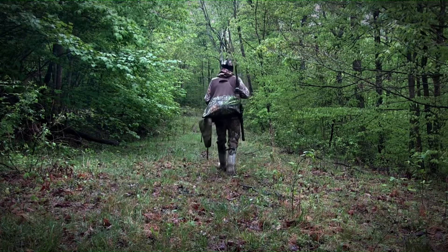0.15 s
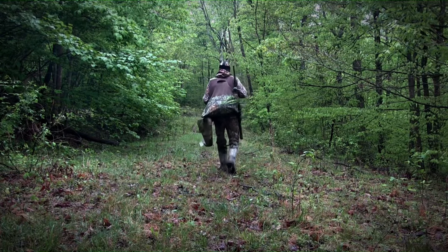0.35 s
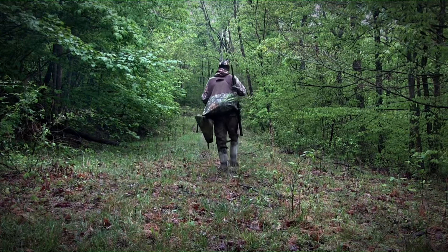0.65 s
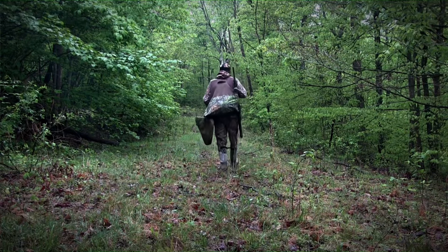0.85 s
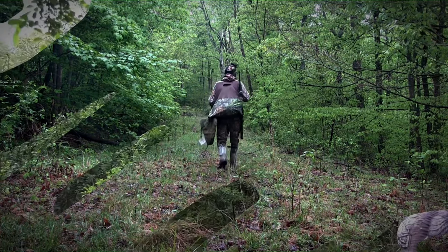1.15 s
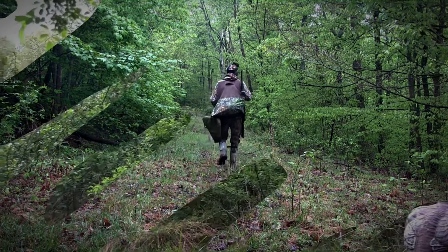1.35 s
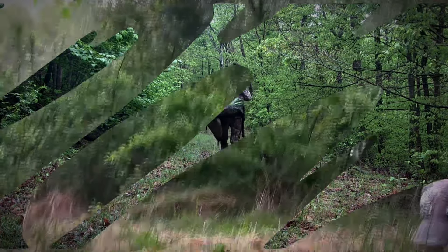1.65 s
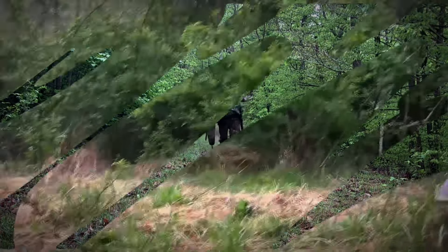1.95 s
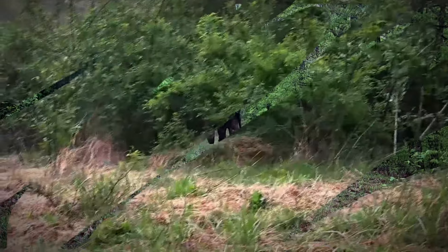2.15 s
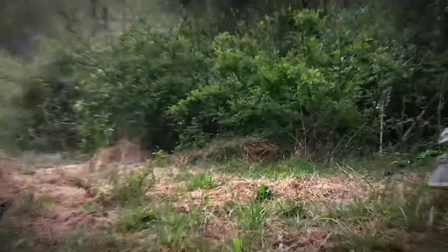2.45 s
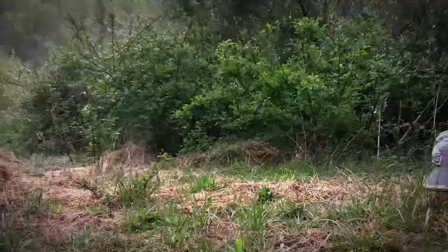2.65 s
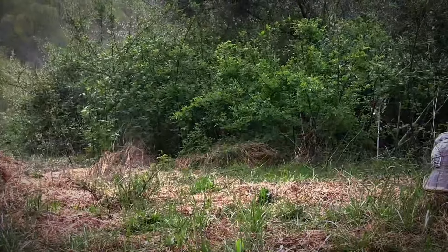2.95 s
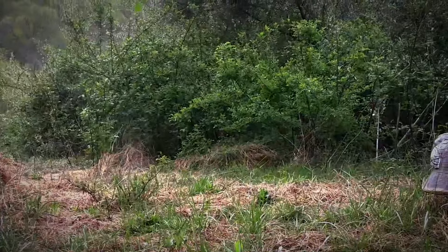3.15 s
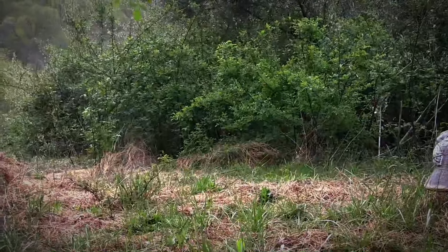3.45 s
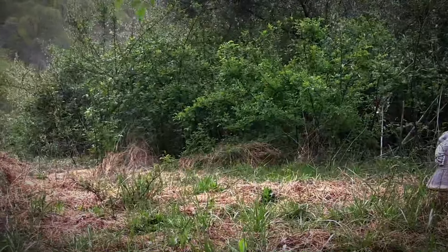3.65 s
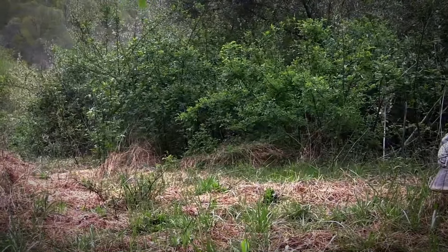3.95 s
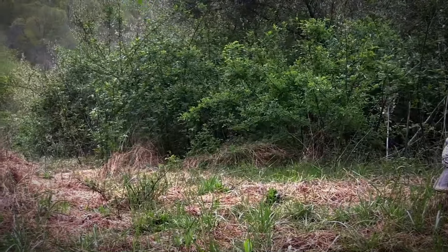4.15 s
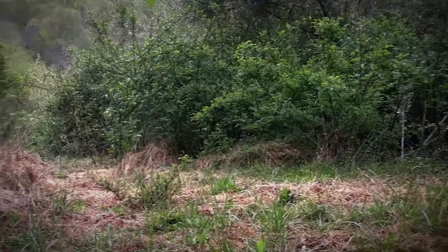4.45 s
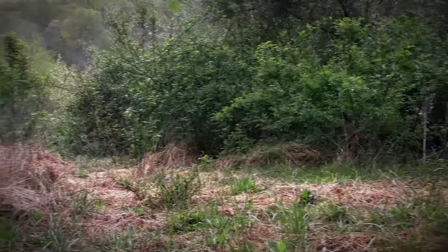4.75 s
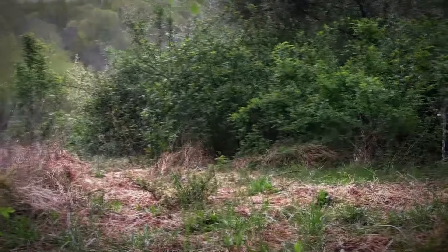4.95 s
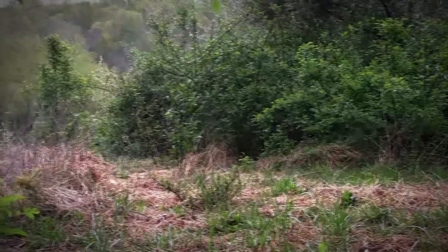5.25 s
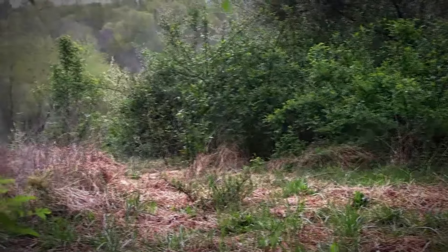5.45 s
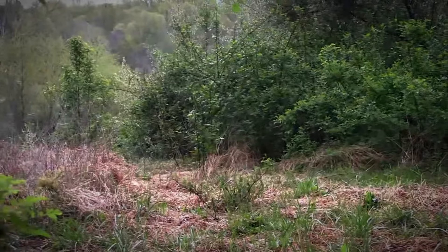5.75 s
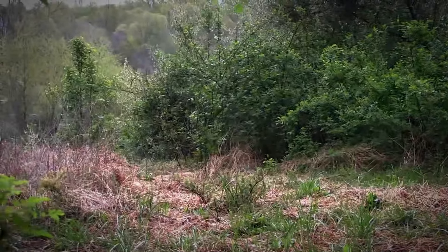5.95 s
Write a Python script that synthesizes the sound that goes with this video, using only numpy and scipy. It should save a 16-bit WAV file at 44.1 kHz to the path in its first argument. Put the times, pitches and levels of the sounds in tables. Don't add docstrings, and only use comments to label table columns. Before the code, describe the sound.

Woodland songbirds whistle and one rattles a trill, small knocks land nearby, then a distant turkey hen yelps and a closer hen answers with raspy yelps.

```python
import sys
import numpy as np
from scipy import signal
from scipy.io import wavfile
from scipy.ndimage import uniform_filter1d

SR = 44100
rng = np.random.default_rng(int(sys.argv[2]) if len(sys.argv) > 2 else 0)


def dump(signal):
    limited = np.clip(np.atleast_2d(signal).T, -1, 1)
    pcm = np.round(limited * 32767).astype(np.int16)
    wavfile.write(sys.argv[1], SR, pcm)


def ratio(d):
    e = np.asarray(d, float) / 20
    return 10 ** e


N = 269010
CUT_S = 2.25


def rms_one(x):
    return x / np.sqrt(np.mean(np.abs(x) ** 2) + 1e-20)


def band(x, low_hz, high_hz):
    return signal.sosfilt(signal.butter(2, [low_hz, min(high_hz, .45 * SR)], "band", fs=SR, output="sos"), x)


def drift(n, rate_hz):
    r = np.exp(-2 * np.pi * rate_hz / SR)
    return rms_one(signal.lfilter([1], [1, -2 * r, r * r], rng.standard_normal(n + 9000))[9000:])


def unfold(rows, fade_s):
    s, *columns = np.transpose(rows)
    at = np.arange(max(round(s[0] * SR), 0), min(round(s[-1] * SR), N))
    t = at / SR
    rise = t - s[0] + (s[0] <= 0)
    fall = (s[-1] - t) / 4 + (at[-1] >= N - 2)
    gate = np.clip(np.minimum(rise, fall) / fade_s, 0, 1)
    return at, gate, [np.interp(t, s, c) for c in columns]


# t/s, pitch f/Hz, effort as level of the ringing fourth partial/dB
NEAR_YELPS = [
    [(3.511, 849, -26), (3.525, 842, -21), (3.54, 827, -24), (3.56, 783, -26), (3.57, 746, -36)],
    [(3.8035, 940, -28), (3.82, 935, -24), (3.86, 921, -17.5), (3.925, 892.4, -22.5), (3.985, 881.5, -23),
     (4.03, 847, -26.5), (4.058, 817, -30), (4.078, 747, -40)],
    [(5.4075, 950, -25.5), (5.425, 932.5, -22), (5.45, 937.8, -15.5), (5.5, 928.4, -11.5),
     (5.532, 916, -16.5), (5.57, 899.5, -13.5), (5.6, 877.6, -25), (5.645, 867.7, -22), (5.676, 788, -34.5)],
    [(5.9085, 956, -27.5), (5.925, 935, -20), (5.95, 921.6, -15), (5.975, 906, -16.5), (6.005, 905, -12.5),
     (6.025, 889, -20), (6.06, 874.7, -15.5), (6.1, 868, -18.5)],
]
# slow throb from t/s, fast throb from t/s, level/dB of partials 1-3,
# of the clear fifth partial, of the upper partials
NEAR_BREAKS = [(3.5, 3.5, -30.5, -33, -26), (3.9, 4.0, -29, -32.5, -29), (5.581, 5.58, -29, -32.5, -27),
               (6.097, 6.097, -30, -40.5, -26.5)]
NEAR_SCOOP = [0, .25, .25, .25]
NEAR_THROAT = [-21, 0, 6, 0, 0, 0, -9, -13, -19, -23, -27, -29, -32, -35, -48, -60]


def near_hen():
    clear_rasp, onset_rasp, onset_s = .04, .5, .032
    slow_rasp, break_rasp, growth_per_s, break_s = .3, .4, 2.2, .02
    slow_throb_hz, fast_throb_hz = 70, 225
    low_follows, raspy_fifth_db = .34, -25.5
    open_s, open_low_db, open_fifth_db = .014, -4.5, -32
    close_s, close_db = .021, -13
    notes, depth, rate = [], np.zeros(N), np.full(N, float(fast_throb_hz))
    for rows, breaks, scoop in zip(NEAR_YELPS, NEAR_BREAKS, NEAR_SCOOP):
        slow_s, fast_s, low_db, fifth_db, upper_db = breaks
        at, _, (pitch, effort_db) = unfold(rows, 1)
        t = at / SR
        age, left = t - t[0], t[-1] - t

        broken = np.clip((t - slow_s) / break_s + .5, 0, 1)
        first_rasp = max(break_rasp, slow_rasp * (fast_s > slow_s))
        raspy = np.where(t < fast_s, slow_rasp, first_rasp + growth_per_s * (t - fast_s))
        onset = onset_rasp * (scoop > 0) * np.clip(1 - age / onset_s, 0, 1)
        depth[at] = np.maximum(clear_rasp + onset, broken * raspy)
        rate[at[(t > slow_s - break_s) & (t < fast_s)]] = slow_throb_hz

        shut = np.clip(1 - age / open_s, 0, 1) * (scoop > 0)
        closing_db = close_db * np.clip(1 - left / close_s, 0, 1) * (at[-1] < N - 2)
        fed = np.clip((t - fast_s) / break_s + .5, 0, 1)
        lows_db = low_db + low_follows * (effort_db + 20) + open_low_db * shut + closing_db / 2
        fifths_db = fifth_db + fed * (raspy_fifth_db - fifth_db) + open_fifth_db * shut + closing_db
        notes.append(np.transpose([t, pitch, lows_db, effort_db, fifths_db, upper_db + closing_db]))
    return hen(notes, NEAR_SCOOP, NEAR_THROAT, depth, rate, loose=.7, fade_s=.0015, third_db_per_hz=.1)


# t/s, pitch f/Hz, level/dB
FAR_YELPS = [
    [(2.855, 850, -55), (2.89, 897.6, -47), (2.94, 889, -48), (2.985, 854, -54)],
    [(3.095, 677, -49), (3.112, 831, -52.5), (3.2, 877.5, -46), (3.3, 851.5, -49), (3.4, 824, -48),
     (3.51, 797, -51)],
    [(4.075, 805, -48), (4.14, 778.5, -49), (4.2, 771.4, -48.5), (4.3, 734, -50), (4.35, 718, -53)],
    [(5.755, 806, -54), (5.78, 838, -51), (5.91, 822.3, -46.5), (6.0, 822, -56), (6.08, 770, -57)],
]
# level/dB of partial 4, partial 5 and upper partials over partials 1-3
FAR_FACING = [(-12.5, -26, -10.5), (3.5, -24, -11.5), (6.5, -7, -5), (8.5, -28, -17)]
# t/s, rasp depth [0-1]
FAR_RASP = [(2.9, .25), (3.2, .4), (3.5, .6), (4.07, .55), (4.35, .5), (5.7, .12)]
FAR_THROAT = [-38, 0, 2, 0.1, 0.1, 4, -3, -2, -7, -8.5]


def far_hen():
    notes = [[(s, hz, db, db + fourth, db + fifth, db + upper) for s, hz, db in rows]
             for rows, (fourth, fifth, upper) in zip(FAR_YELPS, FAR_FACING)]
    depth = np.interp(np.arange(N) / SR, *np.transpose(FAR_RASP))
    throb_hz = np.full(N, 90.)
    return hen(notes, np.zeros(len(notes)), FAR_THROAT, depth, throb_hz, loose=.68, fade_s=.0034)


STIFF = [0.22, 0.58, 0.7]


def hen(notes, scoops, throat, rasp_curve, throb_curve, loose, fade_s, third_db_per_hz=0):
    scoop_s, brighten_db, brighten_s = .0095, -8, .011
    ring_hz, ring_width_hz, ring_db = 947, 30, -14
    out = np.zeros(N)
    for rows, scoop in zip(notes, scoops):
        at, gate, (pitch, *levels_db) = unfold(rows, fade_s)
        n = len(at)
        t = np.arange(n) / SR
        pitch = uniform_filter1d(pitch, size=500) * (1 - scoop * np.exp(-t / scoop_s))
        phase = 2 * np.pi * np.cumsum(pitch) / SR
        beat = 2 * np.pi * np.cumsum(throb_curve[at] * (1 + .265 * drift(n, 37.3))) / SR
        waking_db = brighten_db * np.exp(-t / brighten_s)

        groups = np.zeros((4, n))
        for k, throat_db in enumerate(throat, 1):
            reach = STIFF[k - 1] if k < 4 else np.clip(k / 5, 1, 1.6)
            rasp = np.minimum(rasp_curve[at] * reach + .0008 * k * k, .9)
            jitter = drift(n, 360.0) + 1j * drift(n, 280.0)
            shake = np.sqrt(2) * np.exp(1j * k) * np.cos(beat + k) + loose * reach * jitter
            shaken = np.sqrt(1 - rasp ** 2) + rasp * rms_one(shake)
            partial = shaken * np.exp(1j * (k * phase + k * k))
            fading = 1.2 if k < 4 else .6 if k < 6 else 2 if k < 7 else 4 if k < 9 else 5
            level_db = throat_db + fading * drift(n, 13)
            if k == 3:
                level_db = level_db + third_db_per_hz * np.minimum(pitch - 900, 0)
            if k > 7:
                level_db = level_db + waking_db
            groups[np.searchsorted([3, 4, 5], k)] += ratio(level_db) * partial.imag
        groups /= np.sqrt(uniform_filter1d(groups ** 2, size=1500) + 1e-12)

        ring = rms_one(band(rng.standard_normal(n), ring_hz - ring_width_hz, ring_hz + ring_width_hz))
        groups[0] += ratio(ring_db) * uniform_filter1d(rasp_curve[at], size=900) * ring
        air = rms_one(band(rng.standard_normal(n), 4800, 7000))
        groups[3] += scoop * 5 * np.exp(-t / .0042) * air
        out[at] += gate * np.sum(ratio(levels_db) * groups, axis=0)
    return out


# t/s, f/Hz, level/dB rms
PHRASES = [
    [(2.8, 2900, -64), (2.84, 3110, -56), (2.872, 3100, -52), (2.9, 2090, -48)],
    [(2.9, 2640, -65), (2.93, 2560, -58), (3.0, 2750, -51.5), (3.058, 3530, -55), (3.09, 3650, -50)],
    [(.168, 1753, -50.5), (.21, 2200, -56), (.235, 2450, -48), (.262, 2520, -38)],
    [(1.515, 2674, -53), (1.575, 2638, -38), (1.612, 2600, -42), (1.645, 2630, -56)],
]
# start t/s, length t/s, f/Hz, first level/dB rms, last level/dB rms
HELD = [(0.0, 0.061, 2590, -41, -42), (0.26, 0.197, 2534, -44, -47.5), (1.765, .095, 2585, -39, -35),
        (2.005, .103, 2580, -40, -33.5), (0.46, .19, 3703, -47, -49), (0.136, 0.054, 6400, -61, -62),
        (.212, .15, 6260, -55.5, -71), (1, 0.038, 2390, -53, -58), (1.3, 0.064, 2400, -59, -55),
        (2.5, 0.17, 2385, -63, -60)]
# t/s, level/dB rms
FLIPS = [(1.657, -43), (1.9, -42.5), (2.15, -40)]
# t/s after onset, f/Hz, level/dB
FLIP = [(0, 2270, -15), (.01, 2532, -0.5), (.021, 2740, -2), (.04, 2560, -19)]
# t/s, level/dB rms
DROPS = [(.79, -47.5), (1.13, -46.5)]
# t/s after onset, f/Hz, level/dB
DROP = [(0, 3104, -8), (.07, 3025, 1.5), (.108, 2630, 0.1), (.15, 2245, -11)]
# t/s after onset, f/Hz, level/dB
LOW_SLUR = [(0, 2560, 0), (.036, 2220, 0), (.074, 1840, 0)]
# t/s after onset, f/Hz, level/dB
HIGH_SLUR = [(0, 3900, 0), (.016, 3480, 0), (.036, 3000, 0)]
# start t/s, length t/s, first f/Hz, last f/Hz, level/dB rms
GLIDES = [(1.4, .03, 6480, 6450, -65), (1.655, .02, 3900, 3300, -58), (1.471, 0.0694, 2510, 1944, -60),
          (1.79, 0.055, 2350, 1900, -58), (2.358, .075, 2740, 3890, -59), (2.452, 0.06, 3530, 3260, -55.5),
          (2.518, 0.087, 2740, 3180, -60), (2.793, .025, 5090, 5140, -62), (4.387, 0.053, 2920, 3320, -54),
          (4.509, 0.041, 3200, 3560, -48.5), (4.871, .09, 3300, 2840, -53.5),
          (4.974, 0.041, 3140, 2750, -50), (5.333, 0.059, 2690, 2390, -54), (5.35, .022, 5160, 5200, -56),
          (5.35, .035, 3880, 3640, -54)]
# start t/s, length t/s, first f/Hz, top f/Hz, last f/Hz
ARCHES = [(2.651, 0.062, 3110, 3480, 2540), (3.7, 0.064, 3320, 3680, 3320),
          (4.472, 0.027, 5910, 7500, 7350), (4.9, .019, 5880, 7450, 7100), (5.007, .038, 3010, 3200, 2980),
          (5.299, 0.055, 2780, 3190, 2560), (5.741, .06, 2900, 3130, 2580)]
ARCHES_DB = [-57.5, -50, -60, -54, -55, -53, -47]


def songbirds():
    sag, swell_s, edge_s, edge_db = .012, .022, .009, -14
    slur_every_s = .2845
    low_slurs = [(3.575 + slur_every_s * k, -47 - .5 * k) for k in range(5)]
    high_slurs = [(4.315 + slur_every_s * k, -49 - k) for k in range(2)]
    notes = list(PHRASES)
    for s, length, hz, first_db, last_db in HELD:
        high, low, end = hz * (1 + sag), hz * (1 - sag), s + length
        notes.append([(s - swell_s, high, first_db + edge_db), (s, high, first_db),
                      (end, low, last_db), (end + edge_s, hz, last_db + edge_db)])
    for events, figure in ((FLIPS, FLIP), (DROPS, DROP), (low_slurs, LOW_SLUR), (high_slurs, HIGH_SLUR)):
        notes += [[(s + dt, hz, db + d) for dt, hz, d in figure] for s, db in events]
    for s, length, first, last, db in GLIDES:
        notes.append([(s, first, db), (s + length, last, db)])
    for (s, length, first, top, last), db in zip(ARCHES, ARCHES_DB):
        notes.append([(s, first, db), (s + length / 2, top, db), (s + length, last, db)])
    return whistles(notes, flutter_db=1.34)


def whistles(notes, flutter_db):
    out = np.zeros(N)
    for rows in notes:
        at, gate, (hz, level_db) = unfold(rows, .0022)
        phase = 2 * np.pi * np.cumsum(uniform_filter1d(hz, size=200)) / SR
        level = ratio(level_db + flutter_db * drift(len(at), 39.0))
        out[at] += gate * np.sqrt(2) * level * np.sin(phase)
    return out


# t/s after onset, f/Hz, level/dB
ARCH = [(-.004, 2990, -12), (.002, 4825, -4.5), (.008, 5696, 0.3), (0.01, 5700, -3), (0.013, 3520, 4.5)]
# t/s after onset, f/Hz, level/dB
CLIMB = [(0.011, 5540, -13), (0.02, 5740, -8), (.028, 6720, -9.5), (.04, 7250, -21), (0.053, 7970, -27)]


def trill():
    start_s, every_s, syllables = .5753, .0728, 9
    loudest_db, peak, arc_db = -23.5, 2.67, .24
    out = np.zeros(N)
    for k, tune in enumerate(1 + .011 * rng.standard_normal(syllables)):
        s = start_s + every_s * k
        db = loudest_db - arc_db * (k - peak) ** 2 - 5
        for part in (ARCH, CLIMB):
            rows = [(s + dt, hz * tune, db + d) for dt, hz, d in part]
            at, gate, (hz, level_db) = unfold(rows, .00054)
            out[at] += gate * ratio(level_db) * np.sin(2 * np.pi * np.cumsum(hz) / SR)
    return out


# t/s, peak level/dB,
# centre f/Hz, tick level/dB, thud level/dB
KNOCKS = [(1.914, -32, 540, -44, -53.5), (2.028, -38.5, 1060, -50, -63), (2.144, -29.5, 667, -55, -53),
          (2.254, -36.5, 1035, -63, -69), (2.718, -32, 303, -53, -51), (2.739, -29.5, 1080, -25, -47.5),
          (2.852, -37, 690, -49, -61), (3.093, -35.5, 1130, -59, -59.5), (3.209, -40.5, 560, -41, -58),
          (4.665, -35, 1460, -27, -69), (4.68, -45, 305, -29, -62)]


def knocks():
    out, t = np.zeros(N + 4000), np.arange(4000) / SR
    for s, db, hz, tick_db, thud_db in KNOCKS:
        noise = rng.standard_normal((2, 4000))
        body = band(noise[0] * np.exp(-t / .0057), hz * .66, hz * 1.44)
        tick = band(noise[1] * np.exp(-t / .00091), 2600, 7700)
        thud = np.sin(2 * np.pi * 160 * t) * np.exp(-t / .022)
        at = round(s * SR)
        out[at:at + 4000] += ratio(db) * body / np.abs(body).max()
        out[at:at + 4000] += ratio(tick_db - 2.5) * tick + ratio(thud_db + 6) * thud
    return out[:N]


def old_tail():
    return ratio(-47.0 - 90 * np.arange(N) / SR) * rms_one(band(rng.standard_normal(N), 3780, 4360))


def wood(x, dull_hz, t60):
    t = np.arange(SR) / SR
    tail = rng.standard_normal(SR) * ratio(-60 * t / t60) * np.clip(t / .0093, 0, 1)
    tail = band(tail, 660, dull_hz)
    return signal.fftconvolve(x, tail / np.sqrt(np.sum(tail ** 2)))[:N]


# f/Hz, level/dB per Hz
AIR = [(15, -58), (25, -24), (169, 3.5), (399, -2.5), (523, 17), (582, 0), (741, 1.5), (1170, -3),
       (2010, -4.5), (2170, -4), (3000, -8.5), (4620, -13.5), (6380, -16), (15500, -26)]
# t/s, level/dB
BREEZE = [(0, -1), (1.3, -1), (1.75, 0.5), (2.25, 0.4), (2.27, -4), (2.8, -4), (3.66, -0.05), (4.4, -0.1),
          (4.74, 1), (5.18, -0.2), (6.1, -1.2)]
# level/dB of rumble, leaves, far chorus, hiss
BED_BEFORE_DB = [-60.5, -54, -56.5, -62]
BED_AFTER_DB = [-60.5, -50, -53, -60]


def bed():
    t = np.arange(N) / SR
    parts, edges = np.zeros((4, N)), 22 * 2 ** np.arange(0, 10.5, .5)
    white, together = rng.standard_normal((2, N)), drift(N, 3.9)
    air_hz, air_db = np.transpose(AIR)
    for k, (low, high) in enumerate(zip(edges, edges[1:])):
        level_db = np.interp(np.log(np.sqrt(low * high)), np.log(air_hz), air_db)
        flicker = np.repeat(drift(N // 16 + 1, 400.0), 16)[:N]
        gain = ratio(level_db + .2 * together + 1.43 * flicker)
        parts[np.searchsorted([240, 1500, 4500], low)] += gain * band(white[k % 2], low, high)
    woods = np.zeros(N)
    for before_db, after_db, part in zip(BED_BEFORE_DB, BED_AFTER_DB, parts):
        woods += ratio(np.where(t < CUT_S, before_db, after_db)) * rms_one(part)
    return ratio(np.interp(t, *np.transpose(BREEZE)) + .5) * woods


def scene():
    t = np.arange(N) / SR
    near, far, song, rattle = near_hen(), far_hen(), songbirds(), trill()
    early = t < CUT_S
    clear = ratio(np.where(t < 1.45, -8, -15)) * song * early
    first = early * wood(clear + ratio(-11) * rattle, 8600, t60=.85)
    second = wood(ratio(-7.0) * (far + song * ~early) + ratio(-25.5) * near, 9400, t60=.85)
    brush = wood(ratio(-15.0) * near, 19000, t60=.22)
    return (near + far + song + rattle + old_tail() + first + second + brush + knocks() + bed())[None]


def low_pass(x):
    return signal.sosfilt(signal.butter(12, 15700, fs=SR, output="sos"), x)


def record(dry):
    mix = signal.sosfilt(signal.butter(1, 60, "high", fs=SR, output="sos"), dry)
    return low_pass(mix)


dry = scene()
out = record(dry)
dump(out)
```